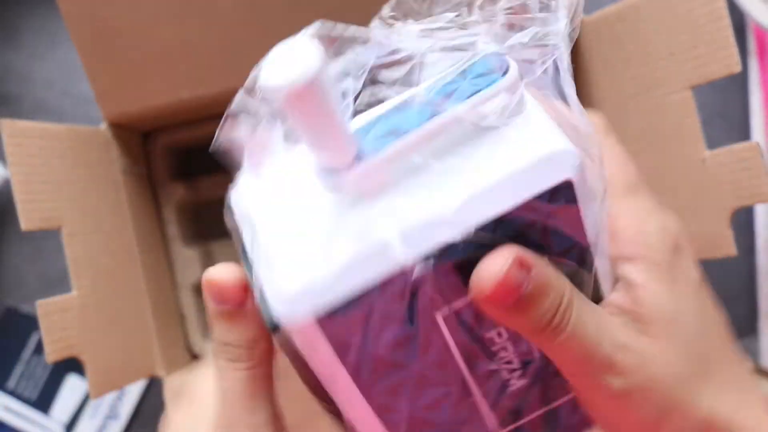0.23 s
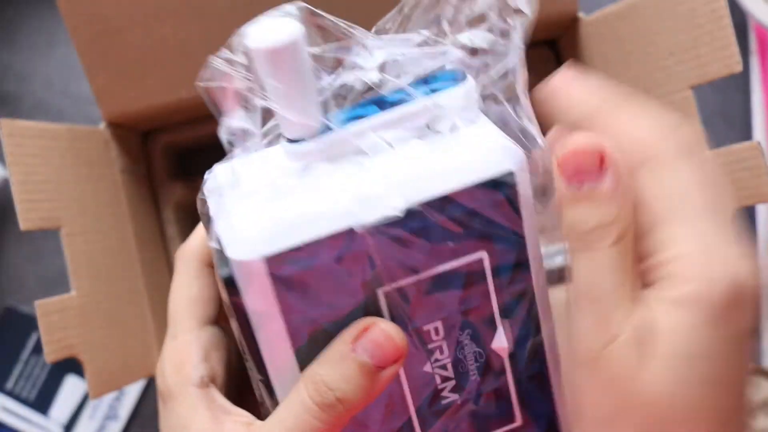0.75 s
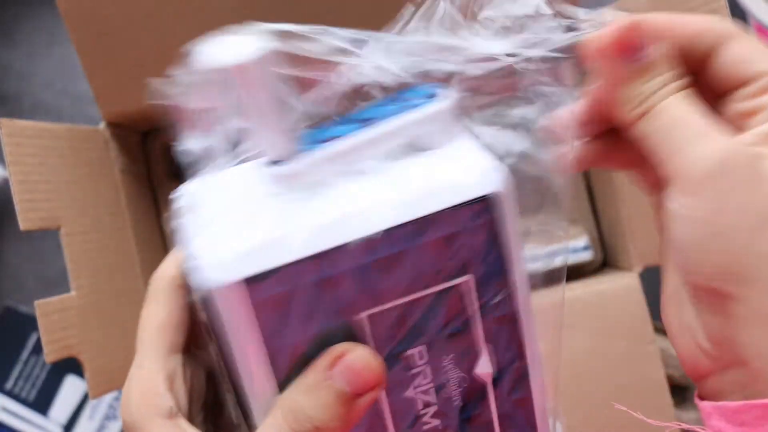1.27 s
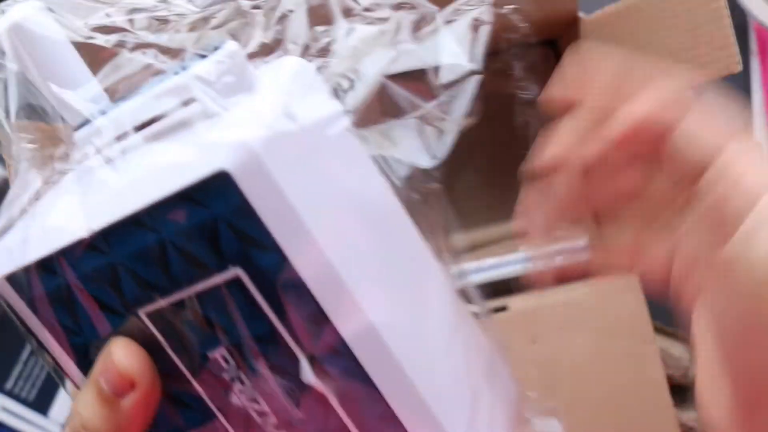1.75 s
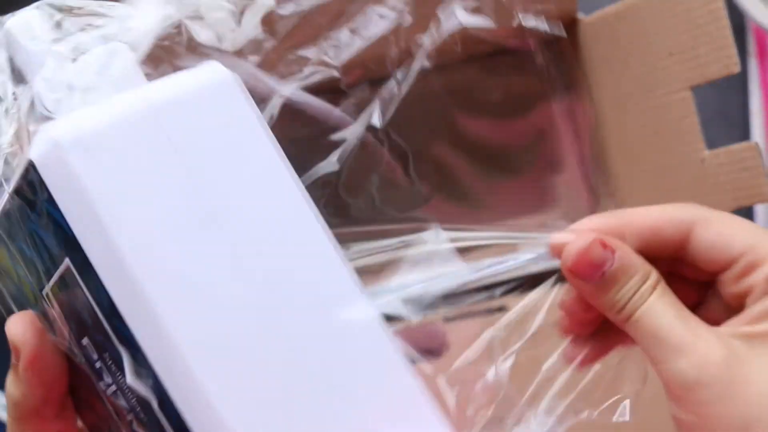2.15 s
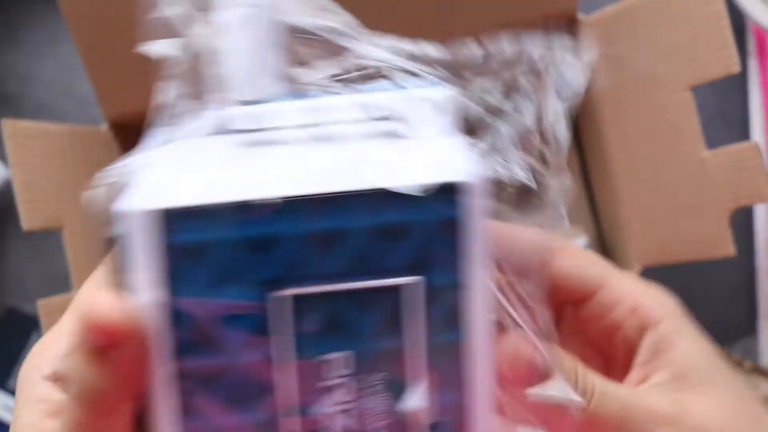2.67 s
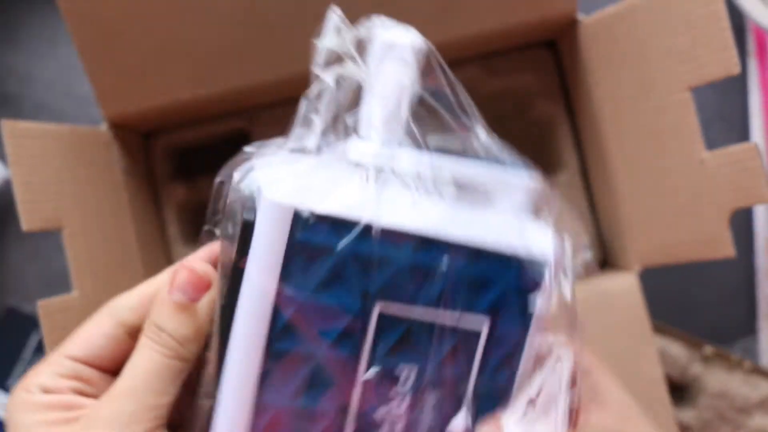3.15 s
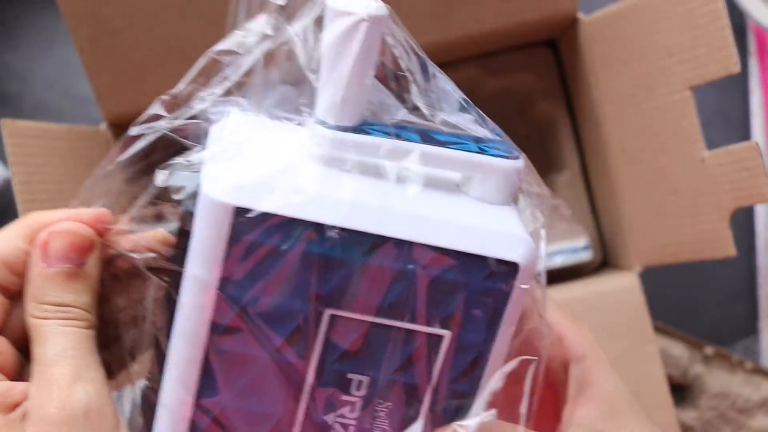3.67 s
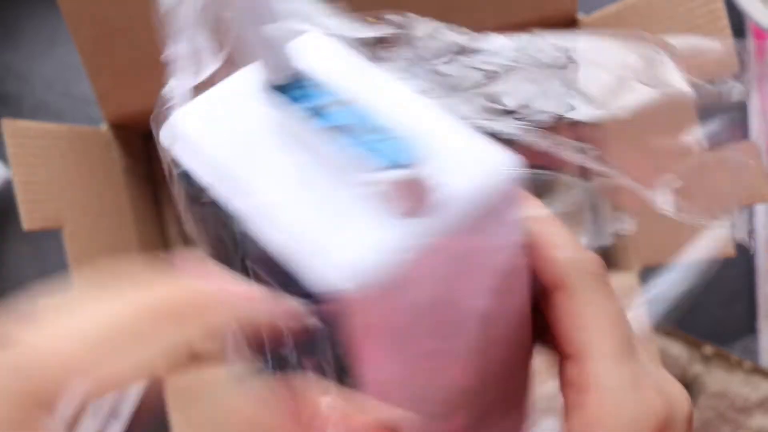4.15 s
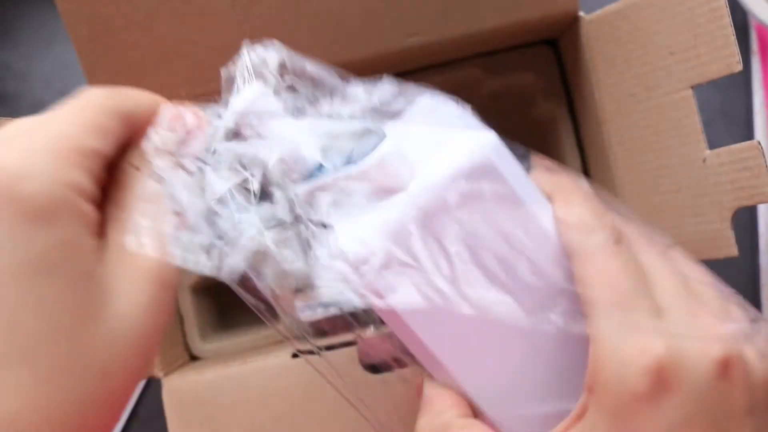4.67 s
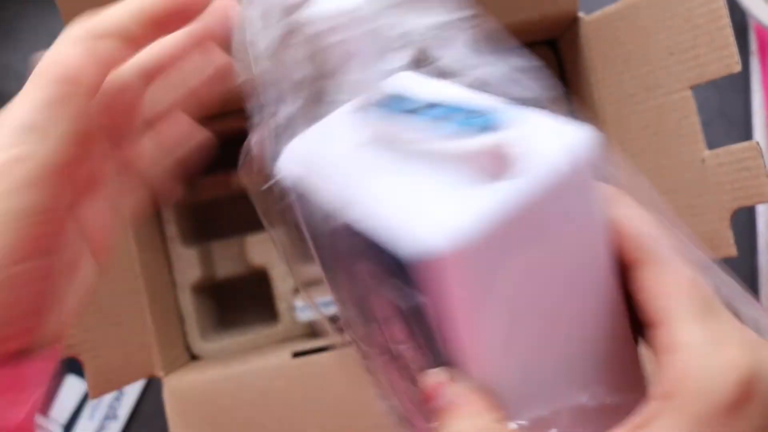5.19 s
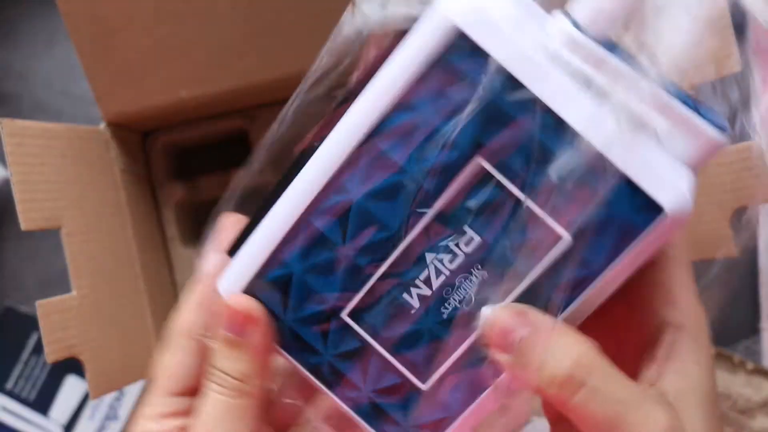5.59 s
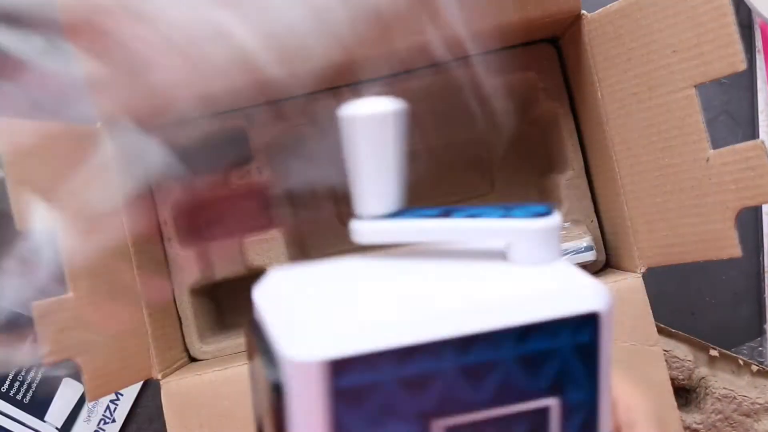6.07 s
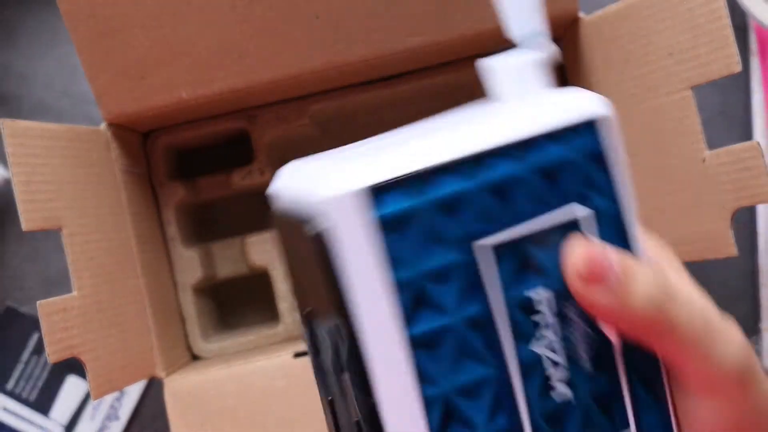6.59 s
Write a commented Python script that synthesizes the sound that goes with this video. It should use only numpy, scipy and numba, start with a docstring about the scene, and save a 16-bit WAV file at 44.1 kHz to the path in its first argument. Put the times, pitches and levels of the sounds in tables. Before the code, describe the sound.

Close, crisp crackling of thin plastic film being pulled off a plastic object in uneven tugs, with small pops and dull taps.

```python
"""A small room, microphone close up: hands pull clear film off a hard plastic item above an open carton.
It opens with light, crisp snaps: the film buckles crease by crease, and each crease rings a few facets.
From about 1 s the pull is harder; each tug sets off a swarm of tiny creases, and wider patches pop over.
Near 2 s come the loudest snaps and finger knocks. Tugs come and go, then thin out after 6 s.
All along, item and carton ring hollow, the hands rumble softly and the room adds a short tail."""
import sys
import numpy as np
from scipy import signal
from scipy.fft import rfft, irfft
from scipy.io import wavfile
from scipy.ndimage import uniform_filter1d
from numba import njit

SR = 44100
rng = np.random.default_rng(int(sys.argv[2]) if len(sys.argv) > 2 else 0)


def wav_out(sig):
    """Save sig, one row per channel (or a flat mono array), as 16-bit PCM at SR to the path in sys.argv[1]."""
    wavfile.write(sys.argv[1], SR, np.round(np.clip(np.atleast_2d(sig).T, -1, 1) * 32767).astype(np.int16))


N = 301325

# still air of the room: (frequency [Hz], level [dB])
AIR_SPECTRUM = [(25, -15), (100, 0.5), (300, -4.5), (1000, -14), (4000, -21), (15000, -40)]
# hands shifting on the item: (frequency [Hz], level [dB])
RUMBLE_SPECTRUM = [(25, -29), (45, -17), (80, -2.5), (140, 1), (200, 2), (320, -9), (800, -61)]
# the two microphone ports differ mainly in the treble: (frequency [Hz], side gain [dB])
MIC_WIDTH = [(60, -8.5), (250, -20), (600, -22.5), (1100, -24), (1700, -13), (2500, -4.5), (4000, -0.5),
             (8000, 0.5), (14000, 0)]
# resonances of the carton below the hands: (frequency [Hz], width [Hz], boost [dB])
CARTON_RESONANCES = [(382, 40, 3), (612, 50, 2), (1705, 90, 2), (2522, 100, 2.5), (3310, 70, 2)]
# the grip frees or damps the item's two resonances and rumbles with each tug:
# (time [s], hollow gain [dB], wall gain [dB], rumble over pull level [dB])
HAND_GRIP = [(0, -11, -10, -26), (.9, -1, -14, -28), (1.5, 8.5, 1, -22.5), (1.68, 4, -5, -15.5),
             (2.1, 10.5, 6, -26), (2.35, 9.5, -3, -22), (2.8, 1, -4, -22), (3.2, -16, 4.5, -31),
             (3.7, -10, -2, -40), (4.25, 5, 5, -16), (4.5, 9.5, 6.5, -25), (5.0, -15, 6.5, -31),
             (5.4, 0, 5, -28), (5.8, -11, -2, -20), (6.0, 1, -7, -19), (6.12, 0, 6, -11.5),
             (6.35, -1, -8, -30), (6.8, 1, 0, -14.5)]
# what the item rings with when struck: (frequency [Hz], level [dB], decay [s])
ITEM_MODES = [(147, -15, 0.013), (274, -9, 0.022), (285, -10.5, 0.025), (381, -12, 0.0079)]
# fingers knocking on the item: (time [s], level [dB])
FINGER_KNOCKS = [(0.677, -33), (1.324, -26), (1.563, -25), (1.673, -24), (1.944, -23), (2.076, -16),
                 (2.112, -19), (2.303, -25), (2.354, -19), (2.89, -20), (4.822, -25), (5.459, -18),
                 (6.528, -25)]
# wider patches of film popping over: (time [s], level [dB], pitch [Hz], decay [s])
PATCH_POPS = [(.407, -12, 505, 0.013), (0.685, -6, 2350, 0.0031), (1.343, -3.5, 2513, 0.01),
              (1.378, -12, 624, 0.016), (1.951, -9, 2800, 0.0051), (2.073, -7.5, 830, 0.011),
              (2.812, -1, 2650, .003), (3.251, -3.5, 1010, 0.0029), (3.376, -8, 557, 0.0074),
              (3.497, -13, 947, 0.01), (3.669, -13, 1180, 0.01), (3.916, -10, 2270, 0.0076),
              (4.218, -12, 2610, 0.0034), (4.900, -3, 968, 0.0052), (5.461, -9.5, 776, 0.0065)]
# average colour of the film at the microphone: (frequency [Hz], gain [dB])
FILM_COLOUR = [(50, -29), (110, -30.5), (190, -15), (280, -6.5), (400, -6.5), (600, -5.5), (900, -5),
               (1200, -6.5), (2200, -4), (3800, -6.5), (5200, -5.5), (9100, -10), (15000, -17.5)]
# how the film moves in front of the microphone:
# (time [s], sliding rustle over coarse crackle [dB], leftward pan [dB], width [dB], facet pitch [Hz])
FILM_MOTION = [(0, 2, -1, -0.5, 4900), (.6, -7.5, 0, -1.5, 6740), (1.1, 0.5, 0, -1.7, 2440),
               (1.5, 1, -1, -1.5, 2150), (2.1, -8, -0.5, -2, 1920), (2.8, -5, -1, -3, 2680),
               (3.3, -9.5, -4, -1, 1570), (4.2, -8.5, -1.5, 0, 2610), (4.6, 0.5, -1.5, -1.5, 5000),
               (5.0, 0.5, -2, -1, 1850), (5.4, -12.5, -1.5, -1, 1740), (5.7, -1, -2.5, -2, 2270),
               (6.1, 1, -2.5, -2, 4250), (6.4, -20, -11, 2, 3320), (6.65, -1, -7, 2, 1120)]
# each tug or slide of the hands on the film:
# (start [s], length [s], level [dB], swell while it lasts [dB], body [dB], crisp edge [dB])
HAND_TUGS = [(0.0, .11, -28, 0, 3.5, 1.5), (0.153, 0.13, -29, -8, 3, 0), (0.273, .045, -35.5, -6, 7, 2),
             (0.365, .02, -34.5, -0.5, -7, -0.5), (0.397, 0.022, -25.5, 1.5, -9, -3),
             (0.463, 0.22, -30, 5, -0.5, -2.5), (0.718, 0.14, -34.5, -2.5, 5, 1.5),
             (0.954, 0.032, -32.5, 9, -11, -6), (0.99, 0.25, -21.5, -8.5, -1.5, -2.5),
             (1.284, 0.098, -26, 6, -1, -3), (1.41, .1, -26.5, 6, -1, -4.5), (1.56, 0.16, -35, 0, 1, -2.5),
             (1.674, 0.098, -20.5, -14.5, -3.5, -2), (1.835, 0.021, -45.5, 0.5, 6, 9),
             (1.932, 0.029, -28.5, 0, 0.5, -1), (1.998, 0.079, -29, 1, -3, -1.5),
             (2.068, 0.047, -23, 2, 2.5, -3.5), (2.182, 0.17, -36.5, 6, 3.5, -5.5),
             (2.443, 0.0091, -44, -2.5, -13, 25), (2.487, 0.011, -40.5, 0.5, 8, -2),
             (2.526, .13, -34.5, 7.5, -0.5, -4.5), (2.693, 0.13, -32, 7.5, -1, -1),
             (2.836, 0.15, -31, -3, 0.5, -3.5), (3.001, .26, -29, 4, -4.5, -1),
             (3.27, 0.086, -30.5, 3, 3.5, 0), (3.383, 0.13, -21, -9, -1, -3.5),
             (3.554, 0.12, -30, 2, -3.5, -2.5), (3.8, 0.088, -25, -0.5, -1.5, -4),
             (3.903, 0.13, -32, 1.5, 5.5, 1), (4.039, 0.023, -24, -1, 3.5, 2.5),
             (4.099, 0.016, -35.5, -0.5, 2, 4), (4.165, 0.18, -37, -3, 1.5, -5),
             (4.329, 0.032, -31, 0.5, 4, -1), (4.362, 0.085, -34.5, 5.5, -10, -5),
             (4.5, 0.15, -28, 7, -1.5, 0), (4.664, 0.31, -25, 1, -1, -3),
             (5.026, 0.076, -27.5, -1.5, -5, -2.5), (5.157, 0.12, -28, 5, -4, -4),
             (5.302, 0.13, -28.5, -5, -2, -5.5), (5.445, .085, -28.5, 2, -0.5, -2),
             (5.58, 0.075, -32.5, 7, -4, -6), (5.664, 0.15, -21.5, -6.5, 1.5, 0.5),
             (5.853, 0.04, -23, -1, 0.5, -2), (5.918, 0.16, -24, -1, 1, -1.5),
             (6.082, .075, -28.5, -11.5, 8.5, -3), (6.196, 0.033, -38.5, 2, 5.5, -5),
             (6.303, 0.06, -36.5, 2, -12, -6), (6.412, 0.015, -31.5, 3.5, -5, -7),
             (6.457, 0.14, -33, -1, 3.5, -3), (6.692, 0.022, -32, 0, 2, -8), (6.765, 0.02, -45, 0.5, 20, 4)]
# large creases snapping through: (time [s], level [dB], body [dB], crisp edge [dB], main facet [Hz])
CREASE_SNAPS = [(0.0603, -18, -14, 6.5, 2580), (0.183, -31, 6, 17, 5000), (0.2065, -23.5, -7, 7, 4550),
                (0.2143, -35, -4, 8, 8400), (0.2362, -23, 12.5, 5, 735), (0.2412, -22.5, -3, 10.5, 5400),
                (0.2814, -29, 2, -8, 950), (0.2964, -31.5, -12, 17, 8400), (0.3161, -32, 11, 6, 5340),
                (0.3207, -35, 9, 12, 5300), (0.352, -28.5, 1, 0, 1770), (0.4073, -15.5, 2, -14, 1540),
                (0.525, -28, -4, 14, 10470), (0.5725, -15, -11, -2, 4360), (0.648, -26.5, 16, 6, 6800),
                (0.6859, -19, 13, 4, 2410), (0.694, -22, 2, 11, 9050), (0.782, -23, 6, -3, 2630),
                (0.7864, -14, -3, -4, 10400), (0.8283, -20.5, -18, 9.5, 3300), (0.834, -23, -21, 5, 2580),
                (0.8613, -20, -21, -2, 3520), (0.912, -25, -14, -6.5, 2620), (0.951, -21.5, -10, -6, 2630),
                (0.987, -19, -18, 2, 2200), (1.0146, -12, -17, -3, 2070), (1.0839, -13, 2.5, -8, 2600),
                (1.171, -14, 0.5, -2.5, 2540), (1.226, -10, -8, -21, 2556), (1.2448, -12, -19, -3.5, 2530),
                (1.2893, -16, -13, -9, 2270), (1.3478, -6.5, -2, -13, 2370), (1.3868, -8.5, 1.5, -18, 606),
                (1.4967, -8.5, -11, -9, 2710), (1.6102, -26.5, 10.5, 6.5, 1940),
                (1.638, -14.5, -22, -8, 1800), (1.683, -16.5, 3, 1, 2310), (1.769, -17.5, -13, -4.5, 1990),
                (1.838, -21, 8, -7.5, 2500), (1.8794, -20.5, -33, 0.5, 2600), (1.9331, -21, 6, -9, 2710),
                (1.9488, -14.5, -4, -6.5, 2520), (1.975, -19.5, -7, -0.5, 8350), (2.0008, -24, -5, 4, 7800),
                (2.031, -11.5, -5, -14, 905), (2.0729, -4.5, -10, -5, 853), (2.0878, -10.5, -15, -1, 1890),
                (2.102, -6, -17, -18, 3000), (2.1089, -12, -12, -9, 2550), (2.2252, -23, -17, -14, 2020),
                (2.2422, -24.5, -10, -1, 2240), (2.298, -20.5, -10, 4.5, 2880),
                (2.393, -25.5, 6, -1.5, 4700), (2.5474, -24.5, -4, 7.5, 4420),
                (2.608, -27.5, 14, 10.5, 5340), (2.637, -25.5, -13, 12.5, 5050),
                (2.731, -27.5, -7, 13, 5280), (2.7546, -18.5, 3, 4.5, 5430), (2.77, -13, -10, 0.5, 3500),
                (2.7875, -16, -10, 1, 2890), (2.814, -10, -38, -12, 2800), (2.891, -20.5, 4, 8.5, 2900),
                (2.9183, -32, -4, 6, 5100), (2.9536, -18.5, -13, -1, 5180), (3.014, -18.5, -6, -8, 957),
                (3.1185, -11.5, 1, -1, 1680), (3.1456, -16.5, 8, -3, 3100), (3.1958, -12, -2, -21, 2820),
                (3.2539, -10.5, -1, -17, 1010), (3.3167, -24, 1, 5, 6500), (3.3907, -22.5, 6, 5.5, 5850),
                (3.405, -9, 3.5, -1.5, 5900), (3.4949, -14.5, 1, -9, 1620), (3.5554, -19, -26, 1.5, 3200),
                (3.6704, -22.5, 3, 7, 1210), (3.7567, -17.5, -5, -18, 970), (3.781, -25, 8, -10, 2280),
                (3.793, -14.5, 2, -18, 1890), (3.8229, -12.5, 5, -3, 1900), (3.8658, -19.5, -10, 6, 5430),
                (3.9168, -12, -26, -3.5, 3400), (4.05, -17, 3, 0.5, 2000), (4.0638, -16, -4, 4, 4900),
                (4.1524, -16.5, -1, -4.5, 1920), (4.1561, -24, 1, -6, 2330), (4.2178, -21.5, -24, -8, 2630),
                (4.2563, -16, -10, -4.5, 3600), (4.3343, -21, -15, 4, 3590), (4.405, -29.5, 8, 19.5, 5700),
                (4.4634, -20, -2, -7, 1320), (4.495, -20, -16, -2, 1890), (4.5072, -19.5, 4, 5, 4780),
                (4.623, -12, 0, -2, 5100), (4.634, -13.5, 5, 1.5, 3300), (4.8134, -9.5, -11, -5, 1760),
                (4.8697, -10, -4, -5.5, 4900), (4.9035, -7.5, -1, -6, 890), (5.0685, -21.5, 1, 2.5, 5660),
                (5.1555, -20.5, -9, 1, 2040), (5.251, -17, 2, 3.5, 1720), (5.4342, -17.5, -14, -10, 1760),
                (5.461, -11, 2.5, -6, 1670), (5.5403, -28, -3, 13.5, 8150), (5.5961, -21.5, 2, 2, 3250),
                (5.644, -18, 0, 1, 2540), (5.8345, -11.5, 0, -1.5, 2450), (5.8943, -17, -14, 10, 2820),
                (5.999, -11.5, -14, -6, 3570), (6.0642, -12, -17, -7, 3100),
                (6.1648, -15.5, -20, -12, 1790), (6.2838, -26.5, -23, 0.5, 3420),
                (6.3138, -21.5, -4.5, -20, 1540), (6.3291, -24, -4, -15, 3060), (6.398, -21, -7, -5, 3750),
                (6.4244, -17, -17, -6, 1720), (6.47, -23.5, -18, 4.5, 13050), (6.5589, -17, 4, -10, 4260),
                (6.5852, -17.5, -11, -4, 4480), (6.6947, -28.5, 9, 0, 4470), (6.72, -14, -20, -12, 4370)]

BODY_HZ, MIDDLE_HZ, EDGE_HZ, TOP_HZ = 570, 2040, 6900, 16000
ATTACK_S, RELEASE_DB_PER_S = 0.0073, 360  # the film tightens quickly and settles when the hand stops
REST_DB, REST_EDGE_DB = -46.5, -10  # faint, dull crackle of film that is merely held
SHARPNESS_DB_PER_DB = 0.38  # a larger crease has a crisper edge


def undb(db):
    """Decibels to gain."""
    return 10 ** (np.asarray(db) / 20)


def side_share(pan_db):
    """How much of the mid goes to the side to place a sound pan_db to the left."""
    return np.tanh(pan_db * np.log(10) / 40)


def follow(curve, t):
    """The columns of a control curve at times t."""
    times, *columns = np.transpose(curve)
    return [np.interp(t, times, column) for column in columns]


def colour(x, points, peaks=(), size=8192):
    """Minimum-phase filter through (frequency [Hz], gain [dB]) points, with resonances on top."""
    hz = np.maximum(np.fft.rfftfreq(size, 1 / SR), 1)
    point_hz, point_db = np.transpose(points)
    curve_db = np.interp(np.log(hz), np.log(point_hz), point_db)
    for centre, width, boost in peaks:
        curve_db += boost / (1 + (2 * (hz - centre) / width) ** 2)
    cepstrum = irfft(np.log(undb(curve_db)))
    cepstrum[1:size // 2] *= 2
    cepstrum[size // 2 + 1:] = 0
    return signal.fftconvolve(x, irfft(np.exp(rfft(cepstrum))))[:N]


def noise(points):
    """Noise of the given colour, rms 1."""
    x = colour(rng.standard_normal(N), points)
    return x / np.sqrt(np.mean(x ** 2))


def resonance(x, hz, width_hz):
    """A single resonance, gain 1 at its centre."""
    return signal.lfilter(*signal.iirpeak(hz, hz / width_hz, fs=SR), x)


@njit
def ring(start, hz, decay_s, gain, side):
    """Damped sines, one per event and mode, summed into mid and side."""
    out = np.zeros((2, N))
    for event in range(len(hz)):
        for mode in range(hz.shape[1]):
            pole = np.exp((2j * np.pi * hz[event, mode] - 1 / decay_s[event, mode]) / SR)
            phasor = gain[event, mode] + 0j
            first = max(int(start[event, mode] * SR), 0)
            for i in range(first, min(N, first + int(6 * decay_s[event, mode] * SR))):
                out[0, i] += phasor.imag
                out[1, i] += (phasor * side[event, mode]).imag
                phasor *= pole
    return out


def room_air():
    """Room tone: still air, far below the handling."""
    return undb(-57.5) * noise(AIR_SPECTRUM)


def reflections(x, near_db=-4.5, near_s=0.0056, room_db=-11.5, room_t60_s=0.073, paths=12):
    """Quick echoes off item and carton, then the room's tail; the paths change as the film moves."""
    t = np.arange(SR // 3) / SR
    echoes = 0
    for _ in range(paths):
        near = rng.standard_normal(len(t)) * np.exp(-t / near_s) * (t > .0005)
        room = rng.standard_normal(len(t)) * undb(-60 * t / room_t60_s) * (t > .008)
        response = undb(near_db) * near / np.linalg.norm(near)
        response += undb(room_db) * room / np.linalg.norm(room)
        drift_hz = rng.uniform(5, 30)
        share = np.cos(2 * np.pi * (drift_hz * np.arange(N) / SR + rng.random()))
        echoes += signal.oaconvolve(x * share * np.sqrt(2 / paths), response)[:N]
    return colour(echoes, [(300, -0.5), (2500, 3.0), (6000, 2.5), (14000, 3.0)])


def tug_energy(t):
    """One row per tug: it sets in, swells or fades while it lasts, and dies away."""
    start, length, db, swell_db = np.transpose(HAND_TUGS)[:4, :, None]
    age = t - start
    held_db = db + swell_db * np.clip(age / length, 0, 1)
    release_db = RELEASE_DB_PER_S * np.maximum(age - length, 0)
    return np.clip(age / ATTACK_S, 0, 1) * undb(held_db - release_db) ** 2


def pull(t):
    """Level, body and edge [dB] of all tugs together at times t; the strongest sets the colour."""
    steps = np.arange(0, N / SR, .001)
    energy, rest = tug_energy(steps), undb(REST_DB) ** 2
    total = energy.sum(axis=0) + rest
    body_db, edge_db = np.transpose(HAND_TUGS)[4:] @ energy / total
    edge_db += REST_EDGE_DB * rest / total
    return [np.interp(t, steps, curve) for curve in (10 * np.log10(total), body_db, edge_db)]


def hand_rumble(t):
    """Hands shift on the item near the microphone and rumble with each tug."""
    return undb(pull(t)[0] + follow(HAND_GRIP, t)[-1]) * noise(RUMBLE_SPECTRUM)


def held_item(film, t):
    """The film drives the item's hollow and its walls, as far as the grip lets them ring."""
    hollow_gain, wall_gain, _ = undb(follow(HAND_GRIP, t))
    hollow = hollow_gain * resonance(film, hz=276, width_hz=44)
    wall = wall_gain * resonance(film, hz=968, width_hz=30)
    return film + hollow + wall


def finger_knocks():
    """A finger strikes the item and sets its low modes ringing."""
    t, db = np.transpose(FINGER_KNOCKS)[:, :, None]
    hz, mode_db, decay_s = np.transpose(ITEM_MODES)[:, None, :] * np.ones_like(t)
    side = np.exp(2j * np.pi * rng.random(hz.shape))
    return ring(t + np.zeros_like(hz), hz, decay_s, undb(db + mode_db), side)


def patch_pops(radiation_db=-8.5):
    """A patch of film flips over like a drum skin and rings briefly at one pitch."""
    t, db, hz, decay_s = np.transpose(PATCH_POPS)[:, :, None].copy()
    side = np.exp(2j * np.pi * rng.random(t.shape))
    return ring(t, hz, decay_s, undb(db + radiation_db), side)


def creases(t, energy, body_db, edge_db, main_hz, pan_db,
            main_db, cycles, hold_s, spread_s, uneven_db, facets):
    """Each buckling crease rings film facets of random size for a few cycles; returns mid and side."""
    place, lateness, sign, phase, strength, damping = rng.random((len(t), 6, facets)).transpose(1, 0, 2)
    octaves = np.log2(TOP_HZ / 170)  # the largest facets reach down to 170 Hz
    hz = TOP_HZ * 2 ** (-octaves * (np.arange(facets) + place) / facets)
    band_share = hz * np.log(2) * octaves / facets / TOP_HZ
    # taut film shakes the item (body); loose, sharp folds give the crisp edge
    low = np.clip(np.log(MIDDLE_HZ / hz) / np.log(MIDDLE_HZ / BODY_HZ), 0, 1)
    high = np.clip(np.log(hz / MIDDLE_HZ) / np.log(EDGE_HZ / MIDDLE_HZ), 0, 1)
    db = low * body_db[:, None] + high * edge_db[:, None] + uneven_db * (2 * strength - 1)
    # the facet nearest the main pitch takes that pitch and rings louder
    distance = abs(np.log(hz / main_hz[:, None]))
    is_main = distance == distance.min(axis=1, keepdims=True)
    hz = np.where(is_main, main_hz[:, None], hz)
    decay_s = (cycles / hz + hold_s) * 2 ** (damping - .5)
    gain = np.sqrt(4 * energy[:, None] * band_share / decay_s) * undb(db + is_main * main_db)
    side = 0.78 * np.exp(2j * np.pi * phase) + side_share(pan_db[:, None])
    # most facets flip at once, a few follow as the fold runs on
    start = t[:, None] + spread_s * lateness ** 2
    return ring(start, hz, decay_s, gain * np.sign(sign - .5), side)


def crackle(per_s, scatter_db, share_s, gain_db, cycles, hold_s):
    """A swarm of small creases, mostly faint, shares out the energy that the pull feeds in."""
    when, size, pitch, pan, bluntness = rng.random((int(per_s * N / SR), 5)).T
    onset = (when * N).astype(int)
    t = onset / SR
    size_db = scatter_db * np.minimum(-np.log(1 - size), 4.0)
    weight = undb(size_db) ** 2
    window = int(share_s * SR)
    smoothed = uniform_filter1d(np.bincount(onset, weight, N), window)
    weight_per_s = uniform_filter1d(smoothed, window)[onset] * SR
    pull_db, body_db, edge_db = pull(t)
    energy = undb(pull_db) ** 2 * weight / weight_per_s
    edge_db += SHARPNESS_DB_PER_DB * (size_db - np.average(size_db, weights=weight))
    edge_db -= 2 * bluntness - 1  # some small creases are sharper than others
    # most main facets ring near the pitch that the tension sets, a few far from it
    detune_octaves = .35 * np.tan(2.6 * (pitch - .5))
    main_hz = np.minimum(follow(FILM_MOTION, t)[-1] * 2 ** detune_octaves, TOP_HZ)
    pan_db = 9 * (pan - .5)
    return undb(gain_db) * creases(t, energy, body_db, edge_db, main_hz, pan_db, main_db=4.0,
                                   cycles=cycles, hold_s=hold_s, spread_s=.001, uneven_db=5.0, facets=18)


def snaps():
    """Large folds give way one at a time, right in front of the microphone."""
    t, db, body_db, edge_db, main_hz = np.transpose(CREASE_SNAPS)
    energy = 0.0014 * undb(db) ** 2
    pan_db = 2.5 * rng.standard_normal(len(t))
    return undb(7.5) * creases(t, energy, body_db, edge_db, main_hz, pan_db, main_db=10.0,
                               cycles=1.0, hold_s=0.00024, spread_s=.0011, uneven_db=1.5, facets=32)


def scene():
    """Snaps, crackle and sliding rustle close to a stereo microphone, carton and room around them."""
    t = np.arange(N) / SR
    slide_db, pan_db, width_db, _ = follow(FILM_MOTION, t)
    coarse = crackle(per_s=300, scatter_db=3.0, share_s=0.013, gain_db=8.0, cycles=0.98, hold_s=0.00021)
    fine = crackle(per_s=1900, scatter_db=2.0, share_s=0.015, gain_db=7.5, cycles=0.99, hold_s=0.000085)
    slide = undb(slide_db)
    film = snaps() + (coarse + slide * fine) / np.hypot(1, slide)
    # the film's mid signal feeds separate echoes into mid and side
    film_in_room = [colour(part + reflections(film[0]), FILM_COLOUR, CARTON_RESONANCES) for part in film]
    # small surfaces radiate almost no deep bass
    bass_cut = signal.butter(3, 170, "highpass", fs=SR, output="sos")
    thumps = signal.sosfilt(bass_cut, patch_pops() + finger_knocks())
    mid, side = (held_item(part, t) + thump + hand_rumble(t) + room_air()
                 for part, thump in zip(film_in_room, thumps))
    side = colour(undb(width_db) * side + side_share(pan_db) * mid, MIC_WIDTH)
    return np.array([mid + side, mid - side])


def record(dry):
    """The recorder clips at full scale and cuts the top."""
    top_cut = signal.ellip(10, .2, 70, TOP_HZ, fs=SR, output="sos")
    return signal.sosfilt(top_cut, np.clip(dry, -1, 1))


dry = scene()
out = record(dry)
wav_out(out)
```